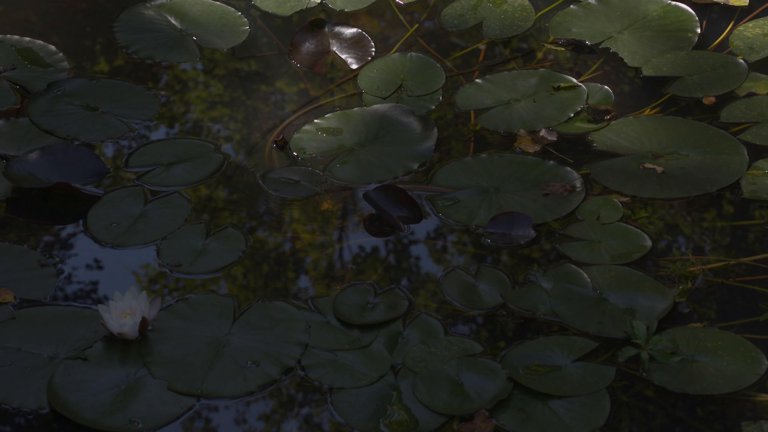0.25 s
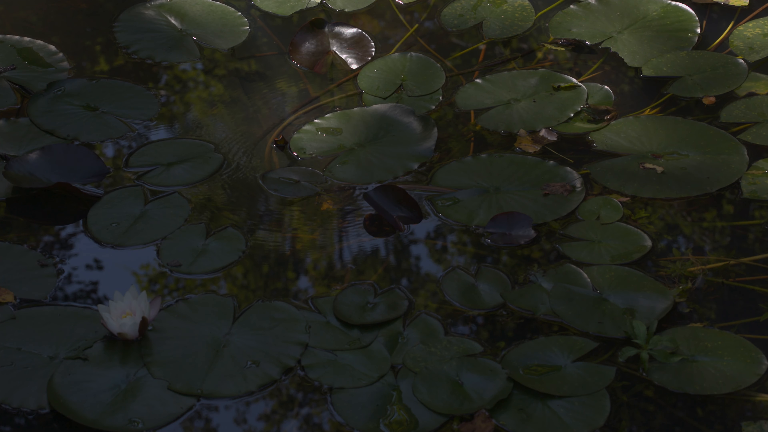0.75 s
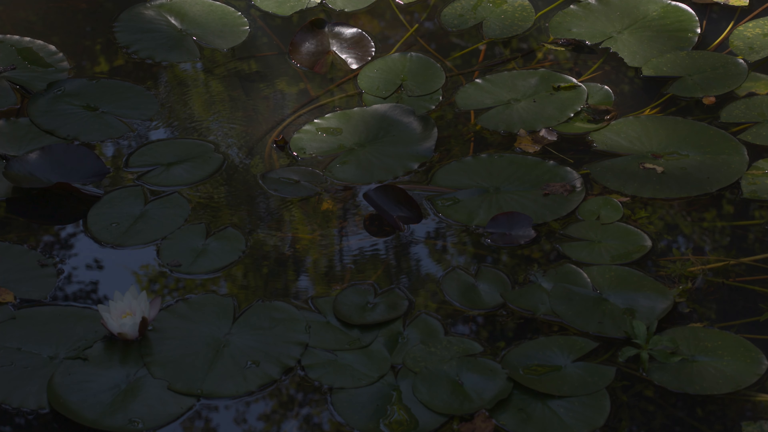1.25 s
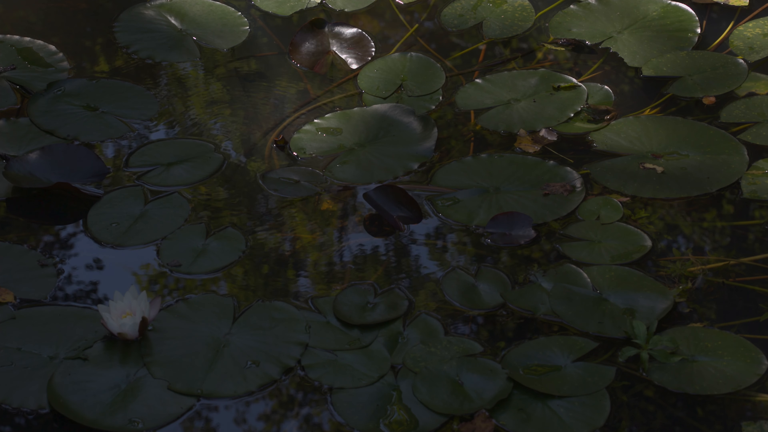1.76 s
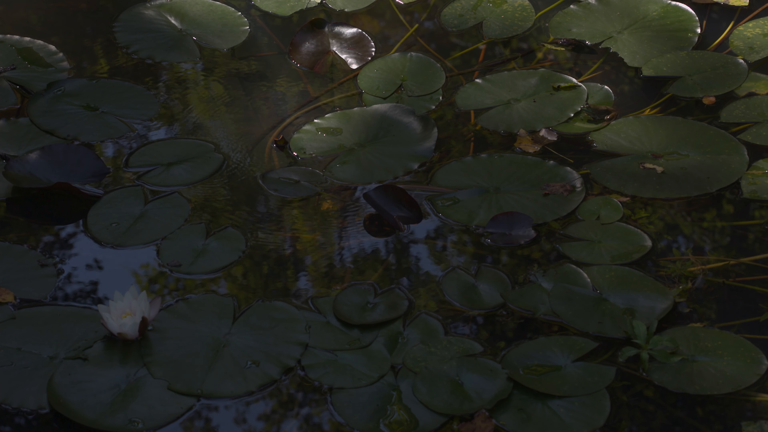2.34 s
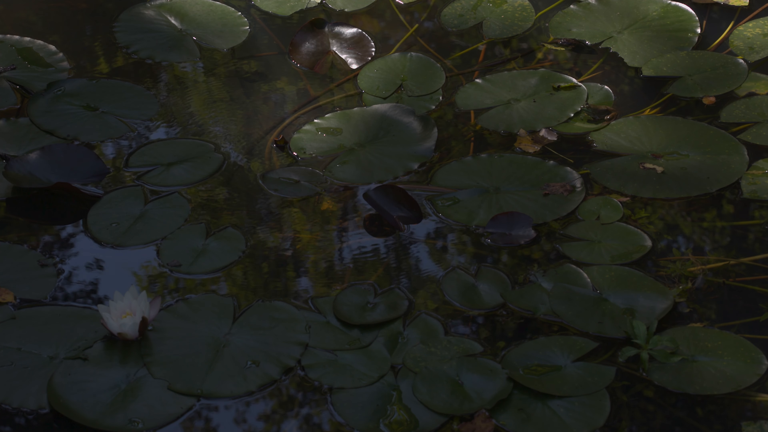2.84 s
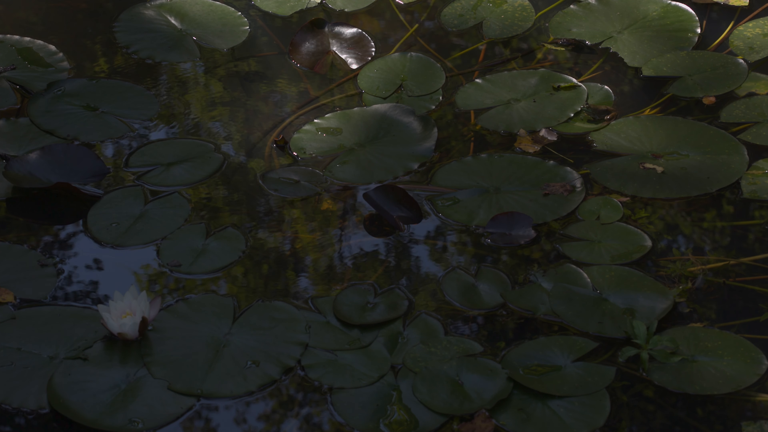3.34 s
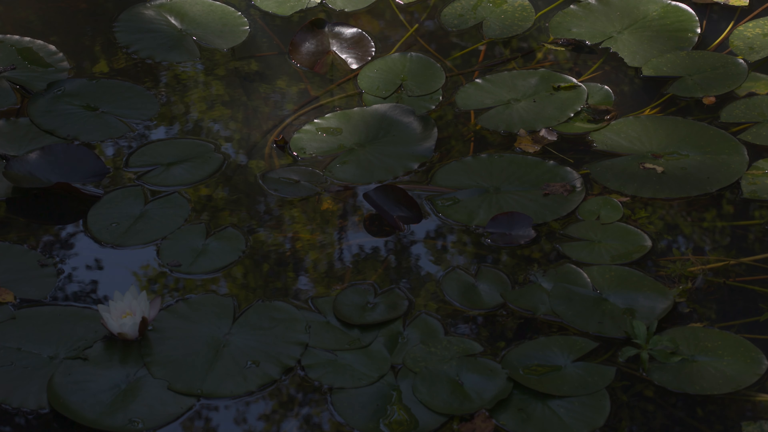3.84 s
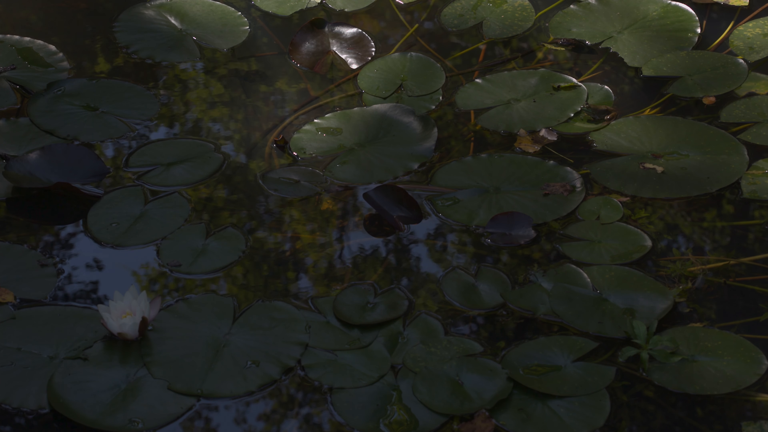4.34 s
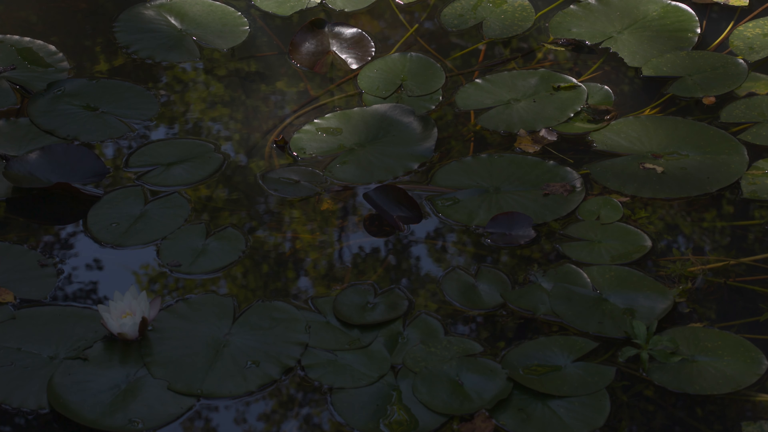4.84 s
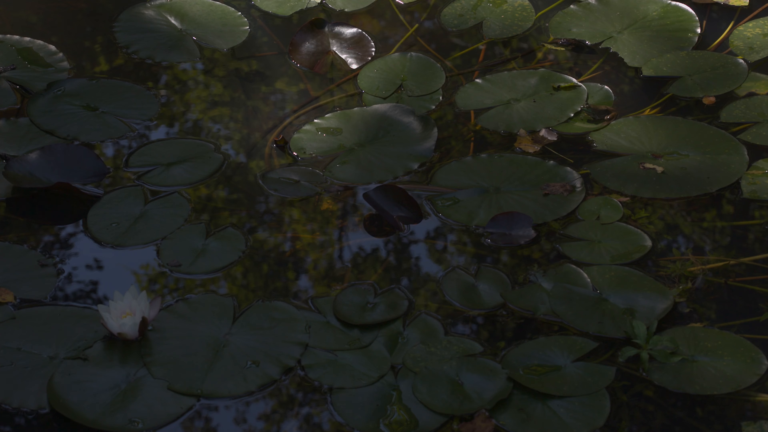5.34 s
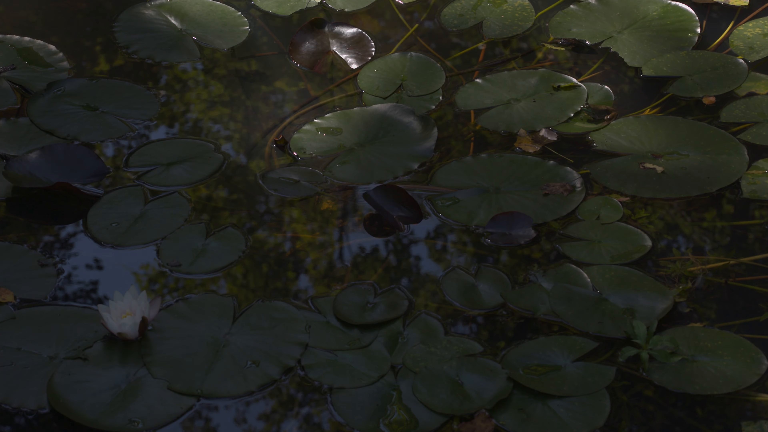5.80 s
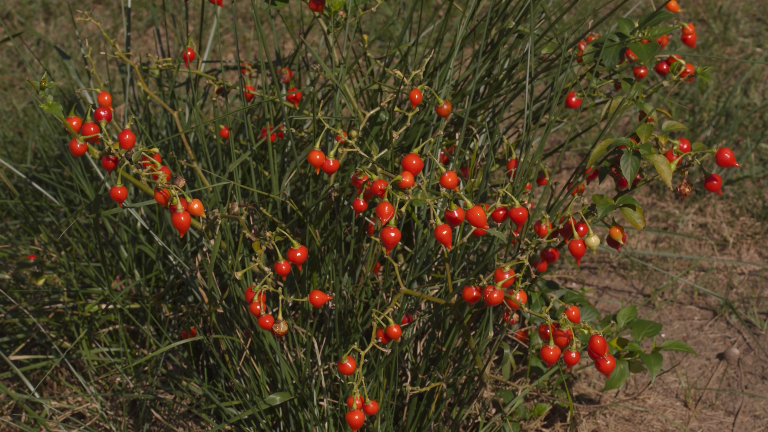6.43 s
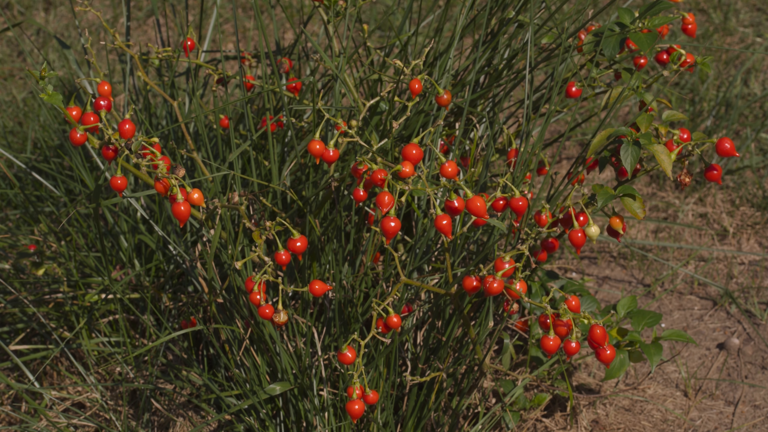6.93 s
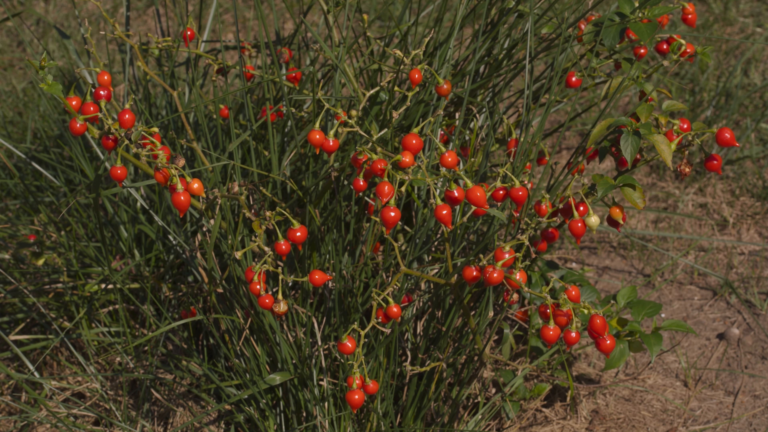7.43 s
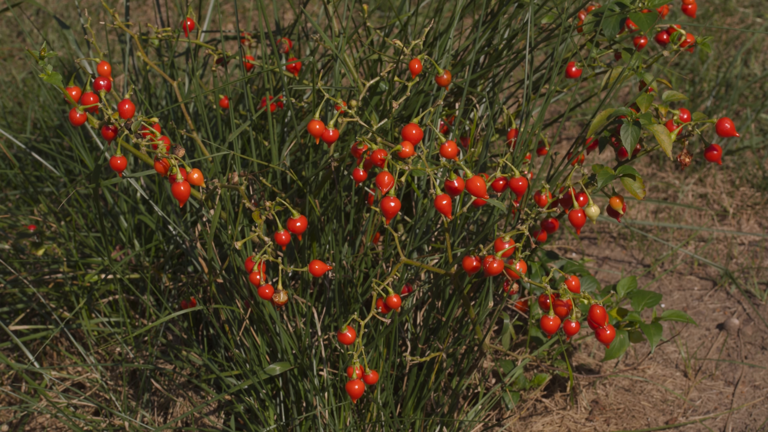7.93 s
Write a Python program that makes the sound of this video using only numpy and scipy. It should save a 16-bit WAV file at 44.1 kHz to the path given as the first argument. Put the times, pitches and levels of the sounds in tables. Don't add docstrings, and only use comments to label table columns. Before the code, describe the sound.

Quiet pond crickets trill with a distant hoarse bird calling across the water, before a sudden cut to a much louder thicket of chirping, buzzing grass insects.

```python
import sys
import numpy as np
from scipy import signal
from scipy.fft import rfft, irfft
from scipy.io import wavfile
from scipy.ndimage import uniform_filter1d

SR = 44100
rng = np.random.default_rng(int(sys.argv[2]) if len(sys.argv) > 2 else 0)


def amplitude_ratio(level_db):
    exponent = np.asarray(level_db, float) / 20
    return 10 ** exponent


def generate_wav(sig):
    pcm = np.round(np.clip(np.atleast_2d(sig).T, -1, 1) * 32767).astype(np.int16)
    wavfile.write(sys.argv[1], SR, pcm)


N = 359856
TIME_S = np.arange(N) / SR
CHANGE_S = 6.296

# middle stroke [t/s], peak [level/dB]
NEAR_CHIRPS = [(-.026, -24), (.324, -24.5), (.737, -25), (1.071, -25), (1.430, -24.5), (1.790, -25),
               (2.128, -25.5), (2.441, -25.5), (2.850, -24.5), (3.169, -24.5), (3.512, -26), (3.895, -25.5),
               (4.264, -25.5), (4.604, -24), (5.024, -25.5), (5.647, -26), (6.036, -25.5)]
# offset [t/ms], step [level/dB], length [t/ms]
NEAR_PATTERN = [
    (-37.5, -1.0, 26),
    (0, 0.1, 27),
    (40.5, 0.6, 26.5),
]
NEAR_HZ, NEAR_FALL_SHARE = 4960, .19
# onset [t/s], top pitch [f/Hz], peak [level/dB]
BANK_STROKES = [(-.002, 5100, -27), (.039, 4960, -31), (.355, 4920, -33), (.403, 4920, -34),
                (.485, 4920, -31.5), (.625, 5000, -33), (1.004, 5100, -30), (1.285, 4950, -36.5),
                (2.068, 5130, -36), (4.845, 5000, -36), (1.632, 5080, -31.5), (1.668, 5160, -37),
                (1.876, 4980, -31), (2.227, 4960, -35), (2.263, 5000, -30.5), (2.662, 5000, -32.5),
                (2.713, 5120, -35), (3.027, 5120, -35), (3.495, 5000, -30), (3.520, 5010, -29),
                (3.574, 4920, -32), (4.344, 5000, -33), (4.414, 5130, -32), (4.692, 4960, -32),
                (5.087, 5030, -34), (5.454, 4980, -30), (5.661, 5170, -33), (5.809, 5010, -32.5)]
BANK_MS, BANK_FALL_SHARE = 20.6, 0.087

# (pitch [f/Hz], spread [share], strokes [1/s], length [t/ms], pitch fall [share]), singers [count]
TRILLS = [
    ((3480, .06, 45, 12, .03), 6),
    ((4950, .014, 26.5, 22, .12), 5),
    ((4720, .045, 26.5, 22, .11), 9),
    ((5400, .055, 83, 7, .04), 6),
    ((6940, .016, 40, 16, .015), 2),
    ((8400, .02, 16.5, 22, .06), 7),
]
# pond [level/dB], grass [level/dB]
TRILL_LEVELS_DB = [(-60.5, -67), (-44.5, -39.5), (-44.5, -45.5), (-47, -40), (-66.5, -57), (-59, -45.5)]
# start [t/s], end [t/s], [level/dB]
THIN_BOUTS = [
    (-1, 3.1, -59.5),
    (3.8, 6.5, -60),
]
THIN_REST_DB, THIN_GRASS_DB = -70, -48.5

# [f/Hz], density [level/dB]
RUMBLE_SPECTRUM = [(12, -36), (20, -21), (48, 3), (75, 0.5), (132, -5), (223, -18.5), (339, -22),
                   (538, -25), (1170, -24.5), (2480, -29), (3000, -31.5), (3900, -30.5), (6600, -120)]
# [f/Hz], density [level/dB]
HISS_SPECTRUM = [(2500, -7.5), (7300, 2), (8700, 0), (10000, -1.5), (13000, -2.5), (16000, -9.5)]
RUMBLE_DB, HISS_POND_DB, HISS_GRASS_DB = -45, -55, -49
# onset [t/s], [level/dB], pitch [f/Hz], length [t/s]
KNOCK = (7.254, -29, 100, .035)

# onset [t/s], [level/dB], pitch [f/Hz], length [t/s]
BIRD_NOTES = [(0.148, -48.5, 1220, 0.081), (1.425, -49.5, 1237, 0.14), (3.144, -39.5, 1418, 0.23),
              (3.439, -34, 1376, 0.13), (3.722, -32.5, 1385, 0.1), (4.025, -34, 1352, 0.17),
              (4.347, -33.5, 1350, 0.082), (4.662, -33, 1376, 0.094), (5, -42, 1360, 0.1796),
              (5.186, -48, 1375, 0.32), (5.444, -44.5, 1395, 0.116), (5.725, -41.5, 1376, 0.22),
              (6.087, -42, 1391, 0.21)]

# resonance [f/Hz], width [f/Hz], scrapes [1/s], duty [share]
POND_WINGS = [(12600, 3000, 50, .6), (15000, 1200, 60, .6)]
GRASS_WINGS = [(10840, 3100, 30, 0.43), (13040, 4100, 56, 0.41), (15100, 1800, 65.5, .5)]
# (start [t/s], end [t/s], [level/dB]) rows, resting [level/dB]
POND_BOUTS = [
    ([(.55, .95, -59), (2.05, 2.47, -61), (3.2, 3.5, -64), (3.75, 4.25, -58), (5.3, 6.15, -59.5)], -72.5),
    ([(.65, .95, -63), (2.05, 2.47, -59), (3.75, 4.25, -63), (5.5, 6.05, -64)], -76),
]
GRASS_BOUTS = [
    ([(6.2, 7.0, -48), (7.0, 7.83, -42), (8.08, 8.3, -55)], -57),
    ([(6.2, 7.1, -41), (7.1, 7.83, -38.5), (7.97, 8.3, -44.5)], -48),
    ([(6.2, 7.93, -43), (8.03, 8.3, -42)], -45),
]

# middle stroke [t/s], peak of each stroke [level/dB]
HIGH_VOICE = [(-32, 4950, 15, 0.045), (-1, 5170, 23.6, 0.16), (38.5, 5200, 23, 0.176)]
HIGH_CHIRPS = [(6.3566, -24.5, -20, -17.5), (6.6849, -23, -19.5, -18), (6.9951, -25, -20, -18.5),
               (7.3235, -25, -20, -18.5), (7.7797, -26, -20, -19)]
LONG_VOICE = [(-32.5, 4740, 22.2, 0.183), (0, 4760, 28.9, 0.21), (39.5, 4805, 27.5, 0.205)]
LONG_CHIRPS = [(6.298, -45, -19, -20), (6.4965, -41, -20.5, -22), (6.6, -29, -18, -18),
               (6.791, -45, -17.5, -47), (6.841, -45, -20, -20), (6.900, -17, -17, -17),
               (7.221, -19, -19, -17), (7.556, -15.5, -15.5, -50), (7.816, -16.5, -16, -15.5),
               (8.094, -16, -17.5, -17.5)]
LOW_VOICE = [(-31, 4460, 17, .09), (0, 4590, 29.7, 0.17), (45, 4550, 31.6, 0.12)]
LOW_CHIRPS = [(6.305, -45, -23, -19.5), (6.754, -45, -19.5, -39), (7.18, -23.5, -19.5, -29),
              (7.514, -25, -27, -24), (7.755, -22, -18.5, -22)]
BRISK_VOICE = [(-31, 4540, 18, 0.11), (0.5, 4635, 19.5, 0.16), (34.5, 4630, 20, 0.093)]
BRISK_CHIRPS = [(6.429, -19, -22, -18), (6.568, -23, -17, -45), (7.227, -24, -14.5, -45)]
PAIR_VOICE = [(-37, 4810, 19.5, 0.11), (-0.5, 4825, 20.7, 0.086)]
PAIR_CHIRPS = [(6.792, -25, -40), (7.098, -20.5, -17), (7.624, -19.5, -17), (7.842, -15.5, -18.5),
               (8.146, -18.5, -17)]
# onset [t/s], top pitch [f/Hz], peak [level/dB]
LONE_STROKES = [(6.391, 4620, -23), (6.810, 4390, -20.5), (6.810, 4600, -22), (6.731, 4480, -27),
                (7.272, 4690, -15.5), (7.118, 4760, -32), (7.164, 4400, -34), (7.411, 4860, -34),
                (7.458, 4330, -34), (7.684, 4870, -25.5), (7.922, 4930, -22), (7.942, 4690, -30),
                (7.972, 4800, -26.5), (8.035, 4440, -30), (8.075, 4610, -27)]
LONE_MS, LONE_FALL_SHARE = 17, 0.1
# first [t/s], last [t/s], beat [t/ms], peak [level/dB], fall [share]
GROUND_RUNS = [(6.299, 6.87, 55.6, -29.5, .11), (6.906, 7.65, 55.4, -31.5, .1),
               (7.683, 8.15, 55.4, -32, .1), (6.338, 6.6, 58.5, -31.5, .05), (6.424, 6.95, 56.5, -35, .04),
               (6.977, 7.46, 56.2, -35, .07), (7.489, 7.8, 58.5, -32, .08), (7.840, 8.15, 58.5, -30, .05)]
GROUND_HZ, GROUND_MS, GROUND_SCATTER_DB = 8313, 19, 1.5


def unit(x):
    return x / np.sqrt(np.mean(x ** 2))


def colour(x, points):
    hz, db = np.transpose(points)
    f_hz = np.maximum(np.fft.rfftfreq(N, 1 / SR), 1)
    gain_db = np.interp(np.log(f_hz), np.log(hz), db, left=-60, right=-60)
    return irfft(rfft(x) * amplitude_ratio(gain_db), N)


def ring(x, hz, width_hz):
    detune = (np.fft.rfftfreq(N, 1 / SR) - hz) / (width_hz / 2)
    return irfft(rfft(x) / (1 + detune ** 4), N)


def walk(rate_hz):
    k = int(SR / rate_hz)
    steps = np.repeat(rng.standard_normal(N // k + 1), k)
    return unit(uniform_filter1d(uniform_filter1d(steps, k), k)[:N])


def scatter(x, t60_s, wet_db, gap_s=0.0054):
    t_s = np.arange(int(SR * .9)) / SR
    tail = rng.standard_normal(len(t_s)) * 1000 ** (-t_s / t60_s) * (t_s > gap_s)
    return amplitude_ratio(wet_db) * signal.fftconvolve(x, tail / np.sqrt(np.sum(tail ** 2)))[:N]


def bouts(rows, rest_db, swell_s):
    level_db = rest_db + sum((db - rest_db) * ((TIME_S > start) & (TIME_S <= end)) for start, end, db in rows)
    return amplitude_ratio(uniform_filter1d(level_db + 0., int(swell_s * SR)))


def strokes(s, hz, db, ms, fall, overtone_db=-60, fade=3):
    k = np.arange(int(np.max(ms) * SR / 1000) + 1)
    u = np.minimum(k / (ms[:, None] * SR / 1000), 1)
    ramp = np.clip(np.minimum(u / .4, (1 - u) / .31), 0, 1)
    shape = np.sin(ramp * np.pi / 2) ** 2
    drop = fall[:, None] * u ** 3.5
    pitch_hz = hz[:, None] * (1 - drop - .03 * (1 - u) ** 4)
    phase = 2 * np.pi * (np.cumsum(pitch_hz, axis=1) / SR + rng.random((len(s), 1)))
    shape = shape * (1 - fade * drop)
    overtone = amplitude_ratio(overtone_db) * shape ** 2 * np.sin(2 * phase)
    tone = amplitude_ratio(db)[:, None] * shape * (np.sin(phase) + overtone)
    place = np.clip((s[:, None] * SR).astype(int) + k + 1, 0, N + 1)
    return np.bincount(place.ravel(), tone.ravel(), N + 2)[1:N + 1]


def pond_crickets():
    near = [(s + offset_ms / 1000, NEAR_HZ, db + step_db, ms, NEAR_FALL_SHARE)
            for s, db in NEAR_CHIRPS for offset_ms, step_db, ms in NEAR_PATTERN]
    bank = [(*row, BANK_MS, BANK_FALL_SHARE) for row in BANK_STROKES]
    pond = strokes(*np.transpose(near), overtone_db=-38, fade=1.3) + strokes(*np.transpose(bank))
    return pond + scatter(pond, 0.4, -13)


def trill(hz, spread, rate_hz, ms, fall, count):
    beats = 720
    own_rate_hz = rate_hz * (1 + .012 * rng.standard_normal((count, 1)))
    beat_s = np.arange(beats)[None] / own_rate_hz + rng.random((count, 1)) / rate_hz - .05
    chance = rng.standard_normal((count, beats, 3))
    keep = beat_s < N / SR
    swell_db = 3.1 * uniform_filter1d(chance[..., 0], size=4, axis=1) + 1.2 * chance[..., 1]
    detune = np.linspace(-1, 1, count)[:, None] + .4 * chance[..., 2]
    pitch_hz = (hz * (1 + spread * detune))[keep]
    song = strokes(beat_s[keep], pitch_hz, swell_db[keep], ms + 0 * pitch_hz, fall + 0 * pitch_hz)
    return unit(song + scatter(song, .3, -4))


def chorus(grass):
    steady = sum(amplitude_ratio(np.where(grass, grass_db, pond_db)) * trill(*voice, count=count)
                 for (voice, count), (pond_db, grass_db) in zip(TRILLS, TRILL_LEVELS_DB))
    thin = trill(6070, .04, 60, 9, .04, count=4)
    bell = trill(6440, .006, 41.7, 13, .03, count=3)
    thin_gain = np.where(grass, amplitude_ratio(THIN_GRASS_DB), bouts(THIN_BOUTS, THIN_REST_DB, .2))
    return steady + thin_gain * (thin + bell)


def air(grass):
    rumble_gain = amplitude_ratio(RUMBLE_DB + 0.68 * walk(4.98))
    rumble = unit(colour(rng.standard_normal(N), RUMBLE_SPECTRUM)) * rumble_gain
    hiss_gain = amplitude_ratio(np.where(grass, HISS_GRASS_DB, HISS_POND_DB))
    hiss = unit(colour(rng.standard_normal(N), HISS_SPECTRUM)) * hiss_gain
    s, db, hz, length_s = KNOCK
    u = np.clip((TIME_S - s) / length_s, 0, 1)
    knock = amplitude_ratio(db) * np.sin(np.pi * u) ** 2 * np.sin(2 * np.pi * hz * (TIME_S - s))
    return rumble + hiss + knock


def bird():
    call, wobble = np.zeros(N), walk(300)
    breath = unit(ring(rng.standard_normal(N), 1280, 700))
    for s, db, hz, length_s in BIRD_NOTES:
        now = slice(int(s * SR), int((s + length_s) * SR))
        u = np.abs(TIME_S[now] - s) / length_s
        bend = .034 * wobble[now] - .1 * np.exp(-u / .12) - .15 * u ** 2.5 + .02
        phase = 2 * np.pi * np.cumsum(hz * (1 + bend)) / SR
        arch = np.sin(np.pi * u ** .6)
        call[now] += amplitude_ratio(db) * arch * (np.sin(phase) + amplitude_ratio(-20) * breath[now])
    return amplitude_ratio(-2.5) * call + scatter(call, 0.75, -3)


def scrape(rate_hz, duty, depth=0.53):
    phase = np.cumsum(rate_hz * (1 + 0.0127 * walk(2.4))) / SR % 1
    pulse = np.exp(-phase / duty) * np.minimum(phase / 0.17, 1) * 2
    gate = 1 - depth + depth * pulse
    return gate * rng.standard_normal(N) * amplitude_ratio(1.9 * walk(200))


def buzz(songs, wings, swell_s):
    return sum(bouts(*song, swell_s) * unit(ring(scrape(rate_hz, duty), hz, width_hz))
               for song, (hz, width_hz, rate_hz, duty) in zip(songs, wings))


def katydids(grass):
    far = buzz(POND_BOUTS, POND_WINGS, .2)
    near = buzz(GRASS_BOUTS, GRASS_WINGS, .06)
    return np.where(grass, amplitude_ratio(-0.5) * near, amplitude_ratio(-2.5) * far)


def chirps(voice, rows):
    return [(row[0] + offset_ms / 1000, hz, db, ms, fall)
            for row in rows for (offset_ms, hz, ms, fall), db in zip(voice, row[1:])]


def grass_crickets():
    song = chirps(HIGH_VOICE, HIGH_CHIRPS) + chirps(LONG_VOICE, LONG_CHIRPS) + chirps(LOW_VOICE, LOW_CHIRPS)
    song += chirps(BRISK_VOICE, BRISK_CHIRPS) + chirps(PAIR_VOICE, PAIR_CHIRPS)
    song += [(*row, LONE_MS, LONE_FALL_SHARE) for row in LONE_STROKES]
    field = strokes(*np.transpose(song), overtone_db=-22)
    beats = [(s, db, fall) for first, last, beat_ms, db, fall in GROUND_RUNS
             for s in np.arange(first, last, beat_ms / 1000)]
    s, db, fall = np.transpose(beats)
    uneven_db = GROUND_SCATTER_DB * np.resize(rng.standard_normal(80), len(s))
    ground = strokes(s, GROUND_HZ + 0 * s, db + uneven_db, GROUND_MS + 0 * s, fall)
    return field + scatter(field, 0.23, -14) + ground + scatter(ground, .1, -13)


def scene():
    grass = TIME_S > CHANGE_S
    crickets = np.where(grass, grass_crickets(), pond_crickets())
    return (crickets + chorus(grass) + air(grass) + bird() * ~grass + katydids(grass))[None]


def band_limit(x):
    return signal.sosfilt(signal.butter(12, 16570, fs=SR, output="sos"), x)


def record(dry):
    low_pass = signal.ellip(12, .2, 70, 15700, fs=SR, output="sos")
    mix = signal.sosfilt(low_pass, dry)
    return band_limit(mix)


dry = scene()
out = record(dry)
generate_wav(out)
```